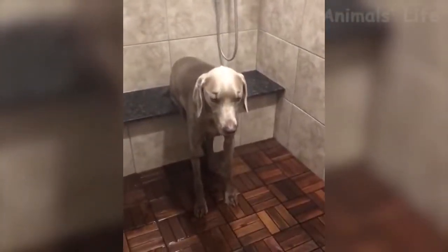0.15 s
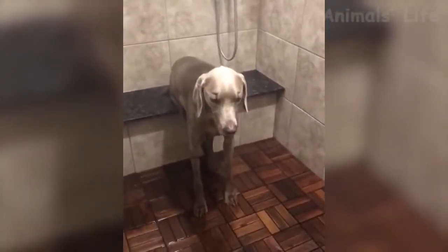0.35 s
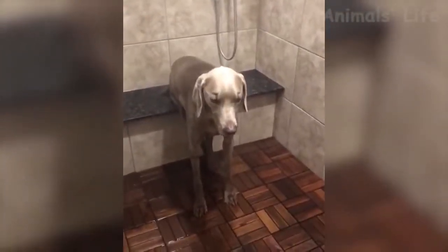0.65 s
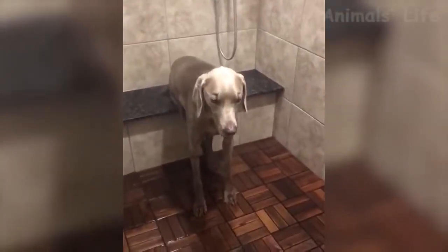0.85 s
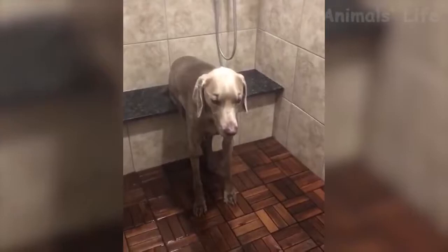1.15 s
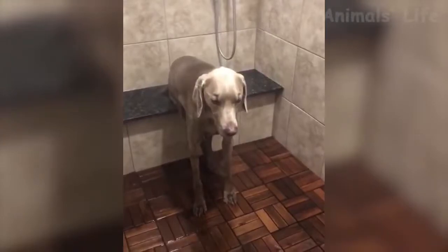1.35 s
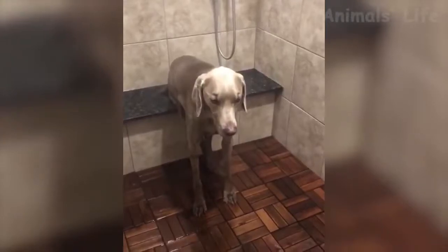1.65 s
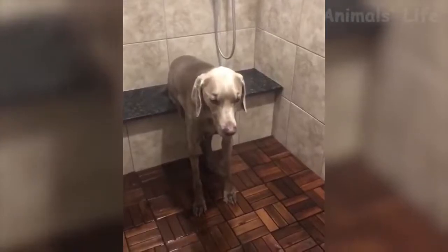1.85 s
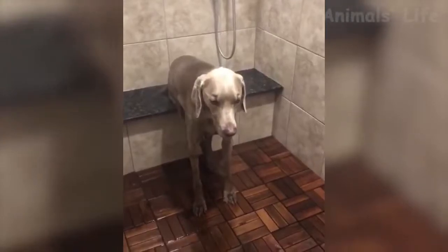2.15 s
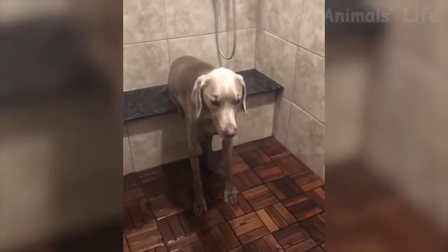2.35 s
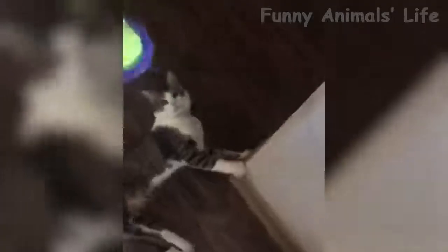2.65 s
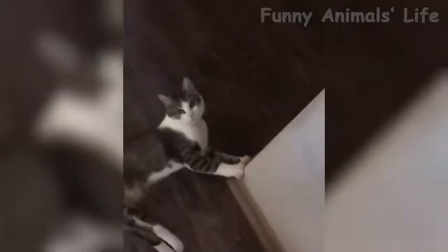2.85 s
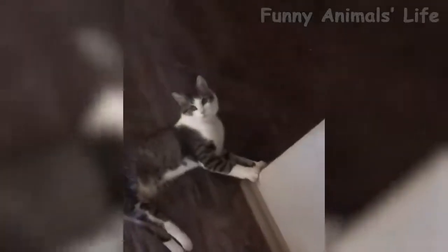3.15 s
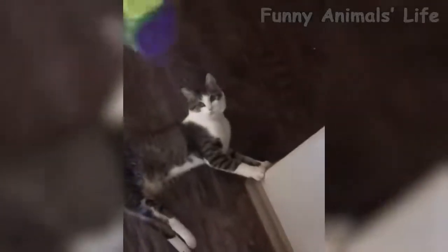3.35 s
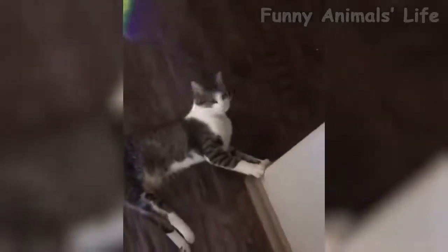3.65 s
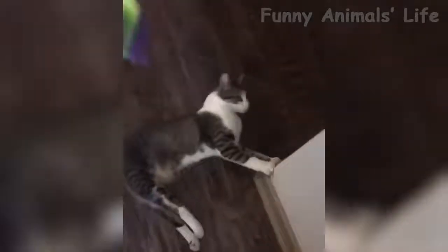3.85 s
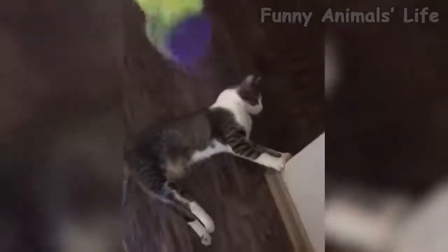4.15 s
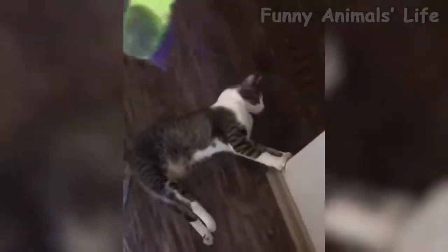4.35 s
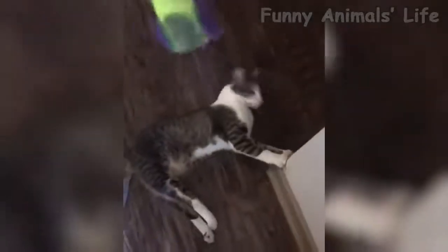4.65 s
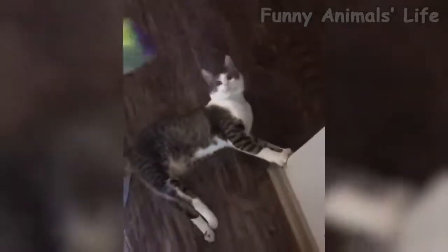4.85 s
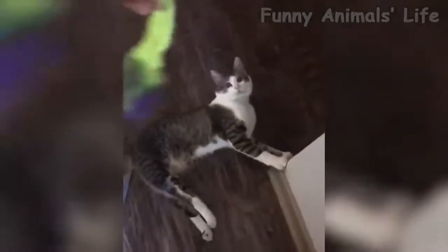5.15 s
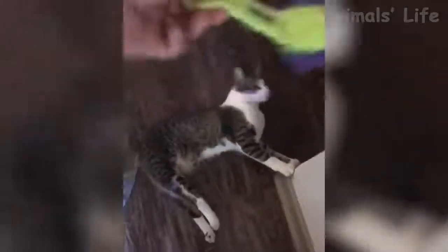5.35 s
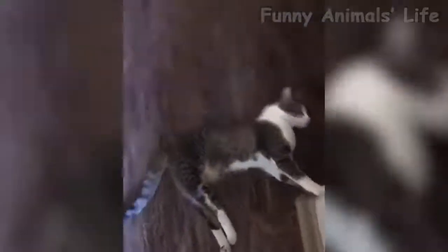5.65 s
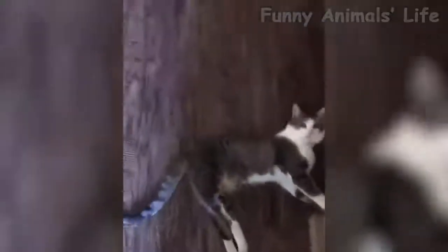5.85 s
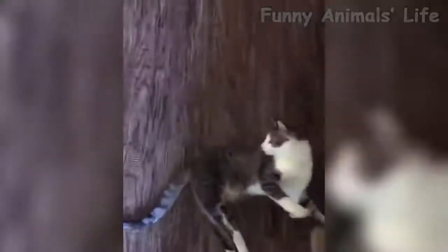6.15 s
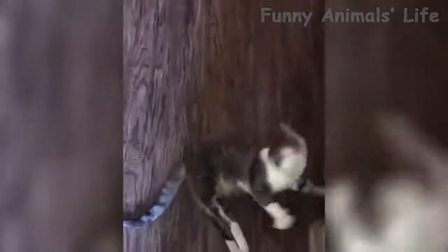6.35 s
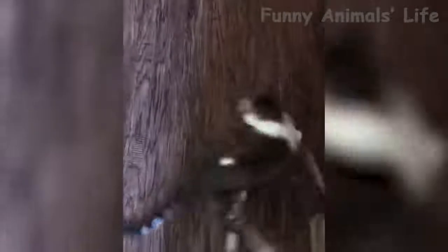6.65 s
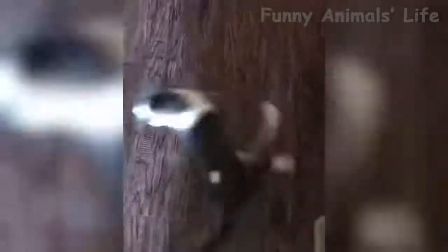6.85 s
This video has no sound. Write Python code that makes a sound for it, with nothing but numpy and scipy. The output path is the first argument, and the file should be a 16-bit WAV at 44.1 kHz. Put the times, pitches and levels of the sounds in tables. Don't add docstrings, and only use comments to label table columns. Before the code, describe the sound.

A shower hisses loudly and steadily in a tiled stall, then cuts abruptly to a quiet humming room with small clicks, cat thumps and scrabbling.

```python
import sys
import numpy as np
from scipy import signal
from scipy.fft import rfft, irfft
from scipy.io import wavfile
from scipy.ndimage import uniform_filter1d

SR = 44100
rng = np.random.default_rng(int(sys.argv[2]) if len(sys.argv) > 2 else 0)


def inscribe(sig):
    pcm = np.round(np.clip(np.atleast_2d(sig).T, -1, 1) * 32767)
    wavfile.write(sys.argv[1], SR, pcm.astype(np.int16))


def volts_from_db(level):
    exponent = np.asarray(level, float) / 20
    return 10 ** exponent


N = 308700
HZ = np.fft.rfftfreq(N, 1 / SR)
CUT_S = 2.603

# (frequency [Hz], level per Hz [dB])
SPRAY_SPECTRUM = [(18, -41), (30, -26), (64, -6), (102, -13.5), (115, -12.5), (134, -4.5), (247, -6.5),
                  (288, -7), (411, -3.5), (586, -10.5), (1360, -9), (1890, -13), (5210, -14.5),
                  (13000, -14)]
# (centre [Hz], width [Hz], level over the spray [dB])
STALL_MODES = [(138.4, 42, 5), (250, 45, 5.5), (355, 9.1, -4), (397, 8.3, -1), (794, 32, 2), (878, 26, 4),
               (976, 35.5, 2), (1318, 11, 7), (1450, 50, 0), (1410, 13, 5.5), (1800, 36, -3),
               (2146, 34, 7.5), (2160, 8.3, -9.5)]
# (time [s], level [dB])
JET_PRESSURE = [(0, -0.5), (.25, -1), (.9, .5), (2.0, 0.5), (2.4, -1.5), (2.6, -0.5)]
BODY_DB, SPRAY_DB, MIST_DB = -29, -2.5, 0.8
# (time [s], peak level [dB], centre [Hz], sizzle length [s])
SLAPS = [(0.33, -11, 3900, 0.0096), (0.6085, -20, 5460, 0.021), (0.8365, -12.5, 5440, 0.03),
         (0.881, -22, 5400, 0.026), (0.973, -12.5, 5130, 0.049), (1.071, -16, 5700, 0.049),
         (1.18, -20, 4260, 0.033), (1.259, -11.5, 3500, 0.016), (1.5916, -18, 3300, 0.019),
         (1.749, -15, 3700, 0.025), (1.8967, -20, 3180, 0.021), (1.962, -14, 5370, 0.018),
         (2.072, -17.5, 4500, .03), (2.179, -21, 4750, 0.049), (2.483, -18, 4630, 0.017)]
SLAP_WIDTH_HZ, SLAP_T60_S = 1800, 0.52
# (time [s], peak level [dB], centre [Hz])
SPITS = [(0.1514, -8.5, 9300), (0.396, -13.5, 8500), (0.5406, -15, 10200), (0.6903, -15, 9600),
         (0.811, -16.5, 10500), (0.9705, -11.5, 7350), (1.2094, -15.5, 12200), (1.26, -23, 11300),
         (1.3598, -15.5, 8260), (1.4595, -17, 8700), (1.6797, -14, 12300), (1.788, -13, 9000),
         (1.9586, -16, 9600), (2.34, -13, 8600), (2.5108, -12.5, 8800)]
SPIT_WIDTH_HZ, SPIT_T60_S, SPIT_SIZZLE_S = 5400, 0.2, 0.017

# (time [s], knock level [dB], boom level [dB], hardness [Hz])
THUMPS = [(6.193, -17.5, -39, 3470), (6.1955, -21, -39, 1490), (6.21, -29, -30, 1200),
          (6.228, -29, -35, 1500), (6.246, -34, -19.5, 1500), (6.584, -35, -32, 3000),
          (6.679, -24, -34, 1570), (6.70, -34, -41, 1500), (6.715, -40, -16, 1200), (6.755, -35, -34, 1186),
          (6.996, -36, -21, 4000)]
# (frequency [Hz], level [dB], decay time t60 [s])
BOARD_MODES = [(135.4, 1, 0.15), (204, 0, 0.11), (299, -5.5, 0.065), (480, -14, 0.067), (696, -9.5, 0.056),
               (900, -5, 0.067), (1100, -1, 0.038), (1370, -6.5, 0.036)]

# (time [s], peak level [dB], cavity [Hz])
CLICKS = [(4.6752, -28, 5600), (4.6775, -20.5, 4470), (4.6795, -25, 3150), (4.682, -37, 1890),
          (4.826, -28, 3200), (4.831, -22, 3150), (4.8352, -23, 3150), (4.842, -26, 2770),
          (4.841, -28, 1810), (4.9875, -27, 2730), (4.989, -24.5, 2730), (4.9935, -29, 2740),
          (4.994, -25, 2050)]
# (time [s], peak level [dB], frequency [Hz])
TICKS = [
    (6.526, -33, 3000),
    (6.534, -37, 2580),
]
# (centre [Hz], width [Hz], level [dB])
CAVITY_BANDS = [(1800, 1000, -13), (5700, 1200, -15), (8700, 1300, -12)]
SLIP_T60_S = 0.013
UPPER_DB, TICK_UPPER_DB = -5, -17
HISS_DB, HISS_DB_PER_OCTAVE, TICK_HISS_DB = -16.5, 11.5, -10

# (time [s], length [s], level [dB], centre [Hz])
SWISHES = [
    (2.611, 0.15, -58, 6500),
    (2.965, 0.052, -59.5, 9000),
    (3.087, 0.13, -46.5, 10900),
    (3.295, 0.22, -58, 5500),
    (4.285, 0.023, -58, 9720),
    (6.295, 0.72, -64, 8000),
    (6.692, 0.4, -57.5, 6000),
]
# (centre [Hz], width [Hz], level [dB])
WEAVE = [(1300, 360, -10), (1910, 370, -12.5), (3350, 760, -8.5), (6740, 1300, -8.5), (8500, 1400, -11)]
# (time [s], length [s], level
# [dB], centre [Hz])
SCRATCHES = [
    (3.339, 0.18, -57.5, 2600),
    (6.587, 0.015, -45, 360),
    (6.68, .02, -43, 4200),
    (6.583, 0.0089, -45, 5300),
    (6.598, 0.038, -43.5, 4000),
    (6.646, 0.029, -46.5, 2800),
    (6.72, 0.045, -64, 4000),
    (6.61, 0.034, -52, 9700),
    (6.866, 0.0093, -52, 5000),
]
# (time [s], length [s], level [dB], centre [Hz])
SLIDES = [
    (6.195, 0.12, -37, 890),
    (6.681, 0.12, -41.5, 1200),
]
# (pitch ratio [1], length share [1], level [dB])
SLIDE_LAYERS = [(2.9, 0.78, -7), (8, 0.34, -16)]
SWISH_SPREAD, SCRATCH_SPREAD, SLIDE_SPREAD = 2.5, 1, 0.8

# (frequency [Hz], level per Hz [dB])
ROOM_SPECTRUM = [(16, -48), (28, -14), (86, -10), (120, -4), (207, -15), (230, -19), (262, -13), (291, -23),
                 (349, -25), (441, -27), (477, -33.5), (529, -30), (867, -32), (2580, -45.5),
                 (14000, -56.5)]
# (centre [Hz], width [Hz], level over the hush [dB])
DRONE_MODES = [(46, 22, 4.5), (120, 10.2, 5.5), (255.4, 9.4, 6), (355.5, 24, 1.5)]
DRONE_DB, HUSH_DB = -35, -35.5
# (centre [Hz], width [Hz], level [dB])
MICROPHONE_DIPS = [(4950, 220, -3), (7660, 510, -3.5), (10200, 790, -3)]
# (time [s], centre [Hz], level [dB])
WIDE_GRAINS = [(.0, 6000, -54), (.823, 5300, -30), (.823, 9600, -38), (1.313, 11100, -39),
               (1.733, 5800, -37), (2.153, 11700, -39), (2.5, 5730, -40), (2.572, 7040, -38),
               (2.572, 11000, -37)]


def spray():
    drops = rng.standard_normal(N) * volts_from_db(np.minimum(3.4 * rng.exponential(size=N), 12))
    blur = rng.standard_normal(N)
    modes = np.sqrt(1 + sum(volts_from_db(db) ** 2 * bell(hz, width) for hz, width, db in STALL_MODES))
    wet = colour(volts_from_db(-6) * unit(drops) + blur, curve(SPRAY_SPECTRUM) * modes)
    shared = walk(15.92)
    patchy = np.zeros(N)
    for k, hz in enumerate(range(0, 15000, 1500)):
        region = np.cos(np.clip((HZ - hz) / 1500, -1, 1) * np.pi / 2) ** 2
        flicker_db = min(k / 3, 1) * (shared + walk(20))
        patchy += volts_from_db(flicker_db) * colour(wet, region)
    low = 1 / (1 + (HZ / 2250) ** 8)
    top = 1 / (1 + (6500 / (HZ + 1)) ** 8)
    jet_db = np.interp(np.arange(N) / SR, *np.transpose(JET_PRESSURE))
    body = volts_from_db(BODY_DB) * unit(colour(patchy, low))
    middle = volts_from_db(BODY_DB + SPRAY_DB + jet_db) * unit(colour(patchy, 1 - low - top))
    mist = volts_from_db(BODY_DB + MIST_DB + jet_db) * unit(colour(patchy, top))
    return body + middle + mist


def slaps():
    out, t = np.zeros(N), np.arange(SR // 2) / SR
    rows = [(*row, SLAP_WIDTH_HZ, SLAP_T60_S) for row in SLAPS]
    rows += [(*row, SPIT_SIZZLE_S, SPIT_WIDTH_HZ, SPIT_T60_S) for row in SPITS]
    for s, db, hz, sizzle, width, t60 in rows:
        envelope = fade(np.maximum(t - sizzle, 0), t60) * np.minimum(t / 0.0012, 1)
        add(out, s, volts_from_db(db - 12.5) * burst(t, hz, width, order=2) * envelope)
    return out


def thumps():
    out, t = np.zeros(N), np.arange(SR // 2) / SR
    for s, knock_db, boom_db, hard_hz in THUMPS:
        knock = 0.5 * burst(t, 970, hard_hz, order=3) * fade(t, 0.046) * np.minimum(t / 0.00092, 1)
        modes = np.zeros(len(t))
        for hz, db, t60 in BOARD_MODES:
            level = volts_from_db(db - 6.5 + 2.4 * rng.standard_normal())
            mode_hz = hz * (1 + 0.047 * rng.standard_normal())
            modes += level * np.sin(2 * np.pi * mode_hz * t) * fade(t, t60)
        boom_hz = 75 * (1 + 0.034 * rng.standard_normal())
        boom = np.sin(2 * np.pi * boom_hz * t) * fade(t, 0.086)
        add(out, s, volts_from_db(knock_db) * (knock + modes) + volts_from_db(boom_db) * boom)
    return out


def clicks():
    out, t = np.zeros(N), np.arange(SR // 40) / SR
    for slips, upper_db, less_db in ((CLICKS, UPPER_DB, 0), (TICKS, TICK_UPPER_DB, TICK_HISS_DB)):
        for s, db, hz in slips:
            ring = np.sin(2 * np.pi * hz * t + 6 * rng.random()) + 0.62 * burst(t, hz, 900, order=2)
            upper = sum(volts_from_db(g) * burst(t, f, width) for f, width, g in CAVITY_BANDS)
            hiss_db = less_db + HISS_DB + HISS_DB_PER_OCTAVE * np.log2(hz / 3000)
            air = volts_from_db(upper_db) * upper + volts_from_db(hiss_db) * burst(t, 6200, 9400)
            slip = ring * fade(t, SLIP_T60_S) + air * fade(t, 0.025)
            add(out, s, volts_from_db(db) * slip * np.minimum(t / 0.00062, 1))
    return out


def swishes():
    out = np.zeros(N)
    for s, length, db, hz in SWISHES:
        add(out, s, rub(length, db, hz, SWISH_SPREAD * hz))
        for f, width, g in WEAVE:
            add(out, s, rub(length, db + g, f, width))
    for s, length, db, hz in SCRATCHES:
        add(out, s, rub(length, db, hz, SCRATCH_SPREAD * hz))
    for s, length, db, hz in SLIDES:
        for ratio, share, g in [(0.9, 0.88, 0), *SLIDE_LAYERS]:
            add(out, s, rub(share * length, db + g, ratio * hz, SLIDE_SPREAD * ratio * hz))
    return out


def rub(length, db, hz, width):
    t = np.arange(int(2 * length * SR)) / SR
    grain = volts_from_db(25 * uniform_filter1d(rng.standard_normal(len(t)), size=200))
    taper = volts_from_db(-4 * t / length) / (1 + (t / length) ** 6)
    return volts_from_db(db) * burst(t, hz, width, order=3) * grain * np.minimum(t / 0.0026, 1) * taper


def living_room():
    hum = np.sqrt(1 + sum(volts_from_db(db) ** 2 * bell(hz, width) for hz, width, db in DRONE_MODES))
    hush = unit(colour(rng.standard_normal(N), curve(ROOM_SPECTRUM) * hum))
    bass = colour(hush, 1 / (1 + (HZ / 400) ** 4))
    return volts_from_db(DRONE_DB + 1.56 * walk(6.1)) * bass + volts_from_db(HUSH_DB) * (hush - bass)


def echo(x, t60, wet_db, damp_hz):
    t = np.arange(SR // 2) / SR
    tail = rng.standard_normal(len(t)) * (t > 0.004)
    low = signal.lfilter(*signal.butter(2, damp_hz, fs=SR), tail)
    tail = low * fade(t, t60) + (tail - low) * fade(t, t60 / 2)
    return x + volts_from_db(wet_db) * signal.fftconvolve(x, tail / np.sqrt(np.sum(tail ** 2)))[:N]


def starve(x, margin_db, depth_db):
    f, _, z = signal.stft(x, SR, nperseg=1024)
    power = uniform_filter1d(np.abs(z) ** 2, size=5, axis=0)
    db = 10 * np.log10(uniform_filter1d(power, size=3, axis=1) + 1e-20)
    margin = margin_db * (10000 / (f[:, None] + 1)) ** 0.7
    weak = db < uniform_filter1d(db, size=60, axis=0) - margin
    return signal.istft(z * np.where(weak, volts_from_db(depth_db), 1), SR, nperseg=1024)[1][:N]


def colour(x, gain):
    return irfft(rfft(x) * gain, N)


def curve(points):
    hz, db = np.transpose(points)
    return volts_from_db(np.interp(np.log(HZ + 1), np.log(hz), db))


def bell(hz, width):
    return np.exp(-2 * ((HZ - hz) / width) ** 2)


def unit(x):
    return x / np.sqrt(np.mean(x ** 2))


def walk(rate):
    k = int(SR / rate)
    held = np.repeat(rng.standard_normal(N // k + 1), k)
    return 1.33 * uniform_filter1d(uniform_filter1d(held, k), k)[:N]


def fade(t, t60):
    return np.exp(-np.log(1000) * t / max(t60, 0.002))


def burst(t, hz, width, order=4):
    f = np.fft.rfftfreq(len(t), 1 / SR)
    band = 1 + np.abs(2 * (f - hz) / width) ** order
    return unit(irfft(rfft(rng.standard_normal(len(t))) / band, len(t)))


def add(out, s, x):
    i = int(s * SR)
    out[i:i + len(x)] += x[:N - i]


def scene():
    stall = colour(spray() + slaps(), 1 / (1 + (HZ / 13150) ** 400))
    near = echo(swishes() + clicks(), 0.52, -7.5, damp_hz=5050)
    far = echo(thumps(), 0.66, -3.0, damp_hz=3000)
    dips = volts_from_db(sum(db * bell(hz, width) for hz, width, db in MICROPHONE_DIPS))
    home = colour(living_room() + near + far, dips)
    home = starve(colour(home, 1 / (1 + (HZ / 14000) ** 200)), margin_db=3.3, depth_db=-22)
    after = np.clip((np.arange(N) / SR - CUT_S) / 0.0016, 0, 1)
    return np.tile((1 - after) * stall + after * home, (2, 1))


def roll_off(x):
    return signal.sosfilt(signal.butter(12, 14230, fs=SR, output="sos"), x)


def record(dry):
    side, t = np.zeros(N), np.arange(2048) / SR
    for s, hz, db in WIDE_GRAINS:
        grain = volts_from_db(db) * burst(t, hz, 1060) * np.sin(np.pi * t / t[-1]) ** 2
        add(side, max(s - t[-1] / 2, 0), grain)
    return roll_off(dry + np.array([side, -side]))


dry = scene()
out = record(dry)
inscribe(out)
```